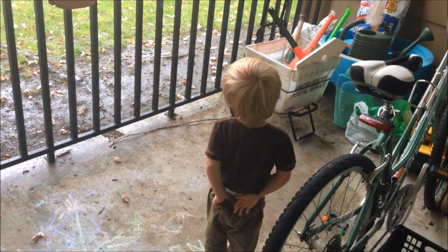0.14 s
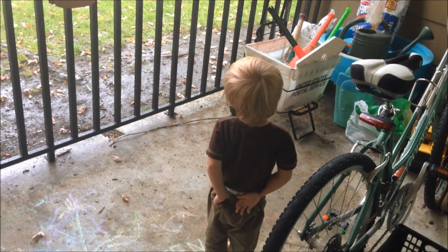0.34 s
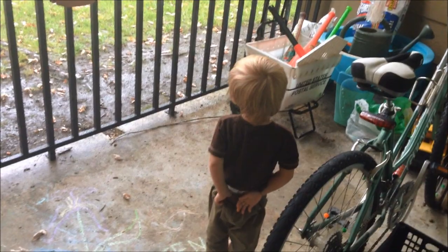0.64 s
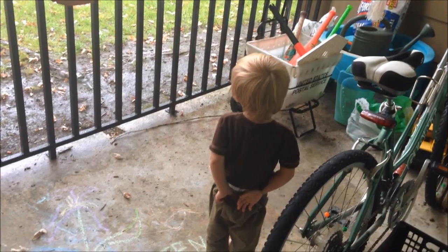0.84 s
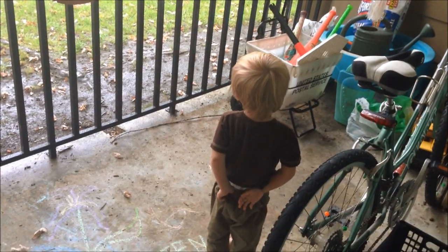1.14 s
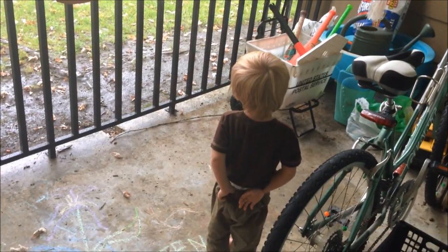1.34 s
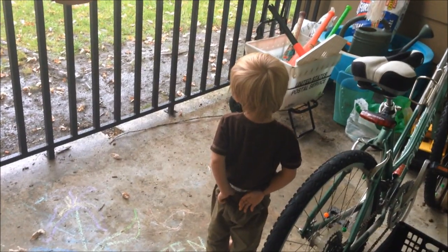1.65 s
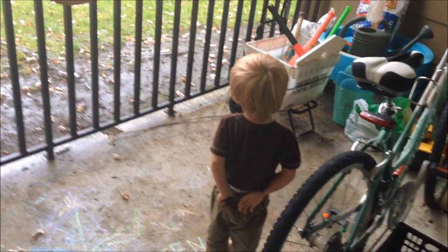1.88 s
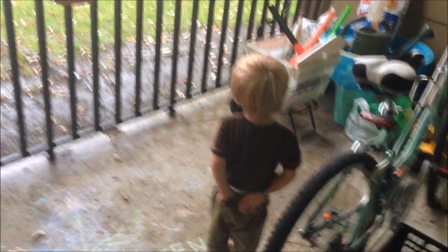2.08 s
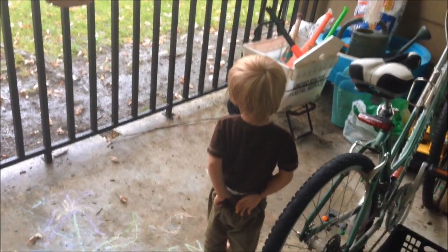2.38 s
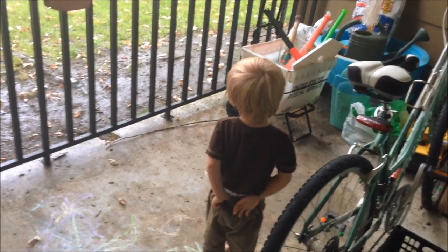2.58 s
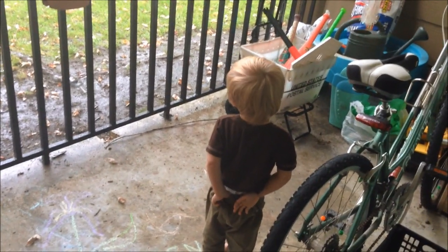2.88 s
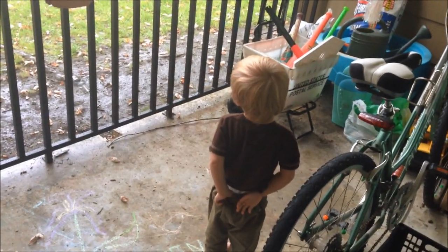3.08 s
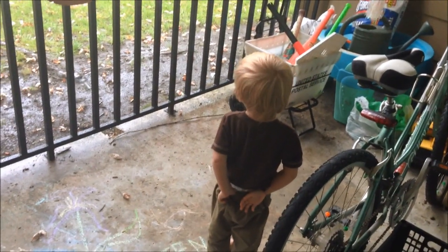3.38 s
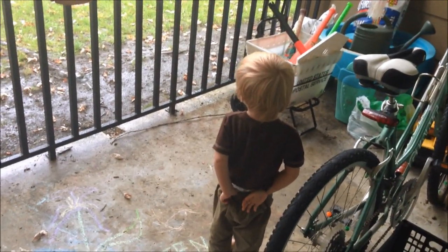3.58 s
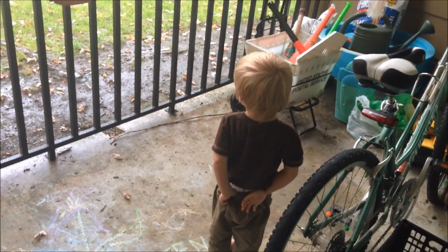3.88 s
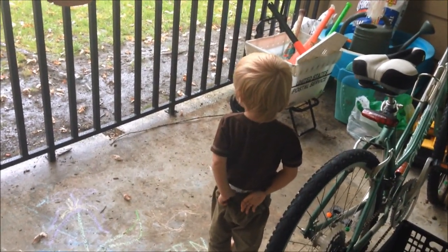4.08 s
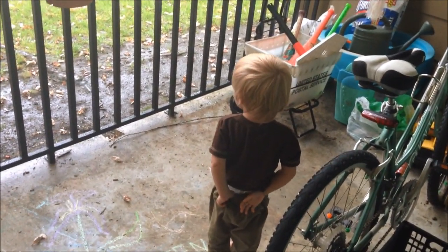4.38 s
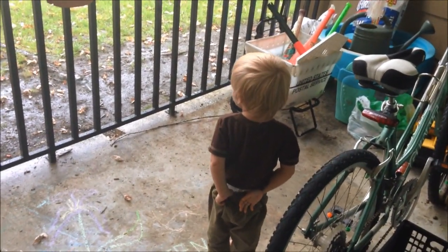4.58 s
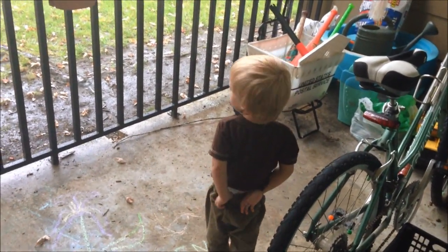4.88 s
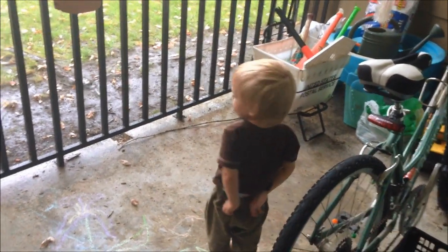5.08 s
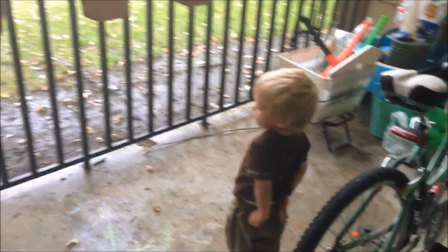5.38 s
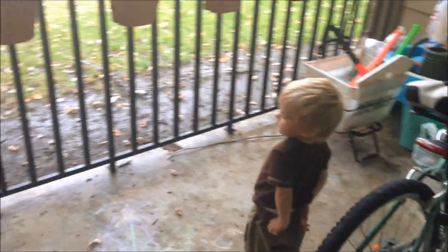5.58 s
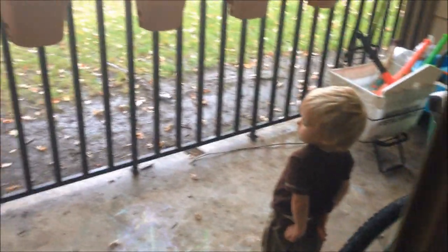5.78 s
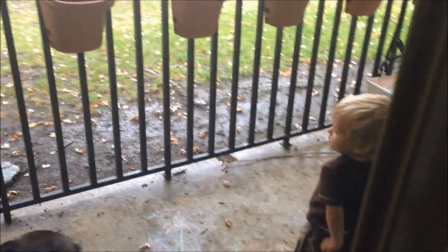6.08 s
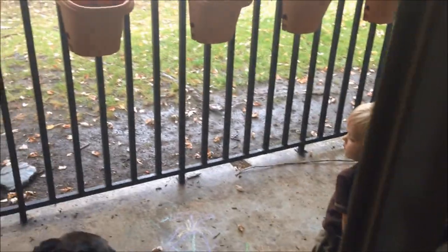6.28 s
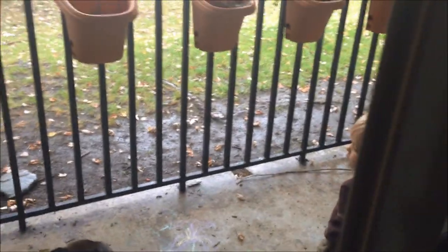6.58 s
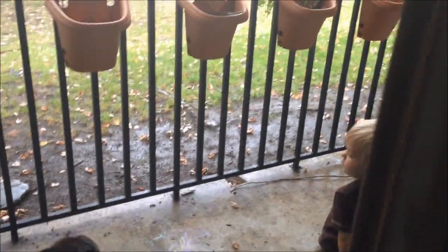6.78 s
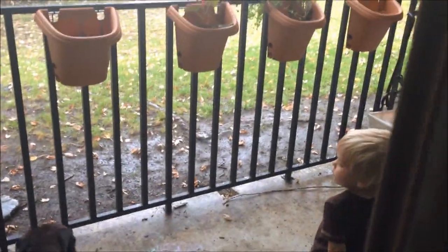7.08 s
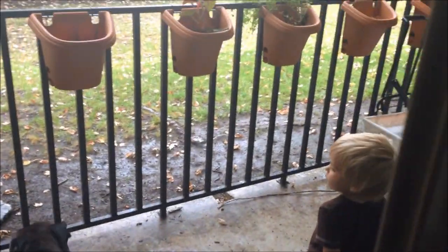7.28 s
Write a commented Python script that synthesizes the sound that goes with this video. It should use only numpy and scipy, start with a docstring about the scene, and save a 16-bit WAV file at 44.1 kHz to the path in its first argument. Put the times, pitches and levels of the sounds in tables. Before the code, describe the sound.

Sharp, uneven drips hit concrete close to the microphone, which sits under a patio roof while rain hisses evenly on the grass and leaves beyond. Duller splashes land in mud between the drips, and the walls add a short echo. Underneath runs a faint, steady machine hum and an outdoor rumble with a few soft bumps. Faint whistles, perhaps distant birds, come early on and once more later.

```python
"""Steady rain on a lawn, heard in mono from under a covered patio.
Far drops merge into a wash; nearer ones plop in mud, patter on leaves and tick on a railing.
Water from the eaves drips on concrete and splashes in the mud; the patio walls throw it back.
Behind it: a steady machine hum, low outdoor rumble with soft bumps, a few faint whistles."""
import sys
import numpy as np
from scipy import signal
from scipy.fft import rfft, irfft
from scipy.io import wavfile
from scipy.ndimage import uniform_filter1d

SR = 44100
rng = np.random.default_rng(int(sys.argv[2]) if len(sys.argv) > 2 else 0)


def to_wav(sig):
    """Store sig (one row per channel, or 1-D mono) as 16-bit WAV at the path in sys.argv[1].

    Samples outside -1..1 are clipped; the rate is SR.
    """
    pcm = np.clip(np.atleast_2d(sig), -1, 1) * 32767
    pcm = np.round(pcm).astype(np.int16)
    wavfile.write(sys.argv[1], SR, pcm.T)  # frames by channels


N = 328545
TIME_S = np.arange(N) / SR

# Table levels are relative.
# Dull body of the rain, easing towards the end: t/s, level/dB
RAIN_BODY = [(0.0, -45.5), (0.65, -54), (1.1, -49.5), (2.3, -53), (3.0, -49), (4.25, -53), (4.9, -50),
             (6.0, -54), (7.45, -54)]
# Spectrum of far rain: f/Hz, level/dB
WASH_SPECTRUM = [(250, -15), (420, 0.5), (770, -1), (850, -3), (1400, -5), (2100, -3.5), (2480, -3),
                 (2850, -6.5), (3700, -4), (6200, -6.5), (7500, -9), (9700, -14), (12500, -18.5),
                 (15200, -20)]
# Drips on the patio edge: t/s, splat level/dB, splat f/Hz, tick level/dB, tick f/Hz, sharpness/0-1
EAVE_DRIPS = [(0.438, -44.5, 4200, -45.5, 6100, 0.1), (0.617, -44.5, 3920, -51.5, 11800, .2),
              (0.835, -55, 6000, -56, 9300, 0), (1.035, -47.5, 5600, -62, 8500, .3),
              (1.215, -48, 7500, -48, 11600, .5), (1.218, -41.5, 5540, -57, 9000, 0.3),
              (1.263, -46, 5400, -61, 10500, 0.1), (1.603, -48.5, 6200, -58, 10000, .3),
              (1.818, -51, 6500, -50, 10200, 0), (2.061, -40.5, 4200, -48, 10000, .75),
              (2.238, -52, 5400, -54, 11000, .8), (2.322, -47.5, 6600, -59, 10000, .8),
              (2.544, -57, 4000, -54, 9800, .8), (3.593, -40, 5800, -48, 12600, 0.6),
              (4.488, -45, 4470, -56, 11000, .1), (4.764, -47, 5400, -57, 10000, .2),
              (5.186, -58, 6000, -50.5, 9200, .2), (5.492, -47.5, 4600, -48.5, 9900, 0),
              (5.687, -38.5, 4300, -48, 7860, 0.3), (5.976, -45.5, 6030, -52, 8600, .1),
              (6.153, -47, 4600, -54, 9000, .7), (6.227, -50, 6500, -56, 8300, .3),
              (6.440, -62, 6000, -54, 11500, .3), (6.584, -36.5, 4700, -44, 8000, .4),
              (6.663, -50, 5600, -56, 9000, .1), (6.775, -48, 6100, -66, 9000, .4),
              (7.090, -43, 4670, -63, 8000, 0.1), (7.382, -39, 4400, -55, 7500, 0.06)]
# Splashes on wet ground: t/s, level/dB, f/Hz
MUD_SPLASHES = [(0.214, -44, 2550), (1.472, -43.5, 2300), (1.689, -44.5, 2200), (2.084, -43, 3300),
                (2.100, -39, 1040), (2.130, -43, 1500), (2.232, -46, 1200), (2.405, -43.5, 1800),
                (2.738, -42, 1490), (2.911, -44.5, 3000), (2.940, -40.5, 1900), (3.020, -43.5, 1000),
                (3.494, -43, 2600), (3.814, -44.5, 2600), (3.865, -45.5, 1400), (4.510, -45, 1000),
                (4.805, -44.5, 1040), (5.190, -49, 1100), (5.355, -45, 1500), (5.378, -44.5, 3900),
                (5.880, -43, 3500)]
# Machine hum, fainter once the microphone turns away: t/s, level/dB
HUM_LEVEL = [(0.0, -45), (3.85, -45), (4.05, -46.5), (5.6, -49), (7.45, -47)]
# Spectrum of outdoor rumble: f/Hz, level/dB
RUMBLE_SPECTRUM = [(20, -29), (42, -29), (58, -9), (80, -12), (112, -10.5), (150, 0.5), (175, -4),
                   (210, -3), (250, -9), (295, -4), (400, -13), (600, -31), (1200, -92)]
# Soft low bumps: t/s, level/dB
LOW_BUMPS = [(0.764, -36), (1.305, -42), (2.111, -36), (2.791, -35), (4.845, -38), (5.01, -40)]
# Thin whistles, perhaps far birds: t/s, length/s, start f/Hz, end f/Hz, level/dB
WHISTLE_NOTES = [(.82, .08, 2600, 2450, -55), (.92, .08, 2650, 2400, -51.5), (1.08, .07, 2250, 2380, -54),
                 (1.34, .06, 2350, 2550, -52), (5.72, .19, 1945, 1952, -49.5)]


def rain(hiss_mean_db=-48.5, hiss_db_per_body_db=-0.68, hiss_rise_db_per_s=0.02):
    """Far wash plus near drops on mud, leaves and railing. Lighter rain sounds finer."""
    body_db = follow(RAIN_BODY)
    hiss_db = hiss_mean_db + hiss_db_per_body_db * (body_db - body_db.mean())
    hiss_db += hiss_rise_db_per_s * (TIME_S - TIME_S.mean())
    body, hiss = gain(body_db), gain(hiss_db)
    wash = gain(3) * np.sqrt(body * hiss) * patchy_noise(WASH_SPECTRUM, patchy_db=1.76)
    mud = shower(per_s=90, span_hz=(780, 1650), octaves=1.6, spread_db=6.5, sharp=0.075, spray_s=0.012)
    leaves = shower(per_s=220, span_hz=(4400, 7500), octaves=1.7, spread_db=1.5,
                    sharp=0.7, spray_s=0.0033)
    railing = shower(per_s=27, span_hz=(8500, 12000), octaves=3, spread_db=-0.5,
                     sharp=0.8, spray_s=0.002, spots=8)
    return wash + gain(-4) * body * mud + hiss * (gain(-9.5) * leaves + gain(-16) * railing)


def shower(per_s, span_hz, octaves, spread_db, sharp, spray_s, spots=24):
    """Drops of random time and size; each landing spot has its own pitch and echoes."""
    out = np.zeros(N)
    for hz in np.geomspace(*span_hz, spots):
        sizes = gain(spread_db * np.minimum(rng.exponential(1, N), 2.5))
        landings = sizes * (rng.random(N) < per_s / spots / SR)
        drop = unit_energy(patio_echo(band(impact(sharp, spray_s), hz, octaves)))
        out += signal.oaconvolve(landings, drop)[:N]
    return unit_rms(out)


def impact(sharp, spray_s, size=3000):
    """One landing: a click with energy share `sharp`, then a decaying spray of droplets."""
    t = np.arange(size) / SR
    spray = rng.standard_normal(size) * rng.exponential(1, size) * np.exp(-t / spray_s)
    return np.sqrt(sharp) * (t == 0) + np.sqrt(1 - sharp) * unit_energy(spray)


def drips(spray_s=0.01, thud_db=-13, thud_ratio=0.63, snap_db=-5.5, gain_db=29.5):
    """Drips on concrete: snap, bright tick, lower splat as the water film spreads, soft thud."""
    out = np.zeros(N)
    for start_s, splat_db, splat_hz, tick_db, tick_hz, sharp in EAVE_DRIPS:
        splat = unit_energy(band(impact(sharp / 2, spray_s), splat_hz, octaves=0.88))
        thud = unit_energy(band(impact(sharp / 2, spray_s), splat_hz * thud_ratio, octaves=0.75))
        tick = unit_energy(band(impact(sharp, spray_s), tick_hz, octaves=0.49, order=3))
        drip = gain(splat_db) * (splat + gain(thud_db) * thud) + gain(tick_db) * tick
        add(out, start_s, patio_echo(drip))
        snap_octaves = 1.4 * (tick_hz / 11000) ** 3  # harder landing: higher tick, wider snap
        snap = unit_energy(band(impact(sharp=0.25, spray_s=0.0023), tick_hz, snap_octaves, order=3))
        add(out, start_s, gain(tick_db + snap_db) * snap)  # direct path only
    return gain(gain_db) * out


def splashes(rise_s=0.0076, top_hz=4700, gain_db=28, size=6000):
    """A string of water breaks on soft ground: a dull droplet cluster swells and dies."""
    out, t = np.zeros(N), np.arange(size) / SR
    envelope = t * np.exp(-t / rise_s)
    for start_s, level_db, hz in MUD_SPLASHES:
        droplets = rng.standard_normal(size) * rng.exponential(1, size) * envelope
        octaves = np.clip(2 * np.log2(top_hz / hz), 0.5, 1.92)
        splash = unit_energy(patio_echo(band(droplets, hz, octaves)))
        add(out, start_s, gain(level_db) * splash)
    return gain(gain_db) * out


def patio_echo(x, echo_s=0.0027, echo_db=-6, tail_db=-3, bass_t60_s=0.28, treble_t60_s=0.21, size=12288):
    """Direct sound, one near-wall reflection, a short tail under the roof. No two spots echo alike."""
    hz, t, spectra = signal.stft(rng.standard_normal(size), SR, nperseg=256)
    t60_s = interp_log_hz([(500, bass_t60_s), (12000, treble_t60_s)], hz)[:, None]
    tail = signal.istft(spectra * gain(-60 * t / t60_s), SR)[1]
    delay_s = echo_s * 2 ** (rng.random() - 0.5)
    response = signal.unit_impulse(size)
    add(response, delay_s, gain([echo_db]))
    add(response, 2 * delay_s, gain(tail_db) * unit_energy(tail))
    return signal.fftconvolve(x, unit_energy(response))


def machine_hum(hz=349, waver_turns=0.008, waver_db=0.9, octave_db=-22, gain_db=-0.8):
    """Steady machine tone with a weak octave; phase and level waver slightly."""
    turns = hz * TIME_S + waver_turns * drift(rate_hz=2)
    octave = gain(octave_db) * np.sin(4 * np.pi * turns) * (1 + 0.5 * drift(rate_hz=3))
    tone = unit_rms(np.sin(2 * np.pi * turns) + octave)
    return gain(follow(HUM_LEVEL) + gain_db + waver_db * drift(rate_hz=14)) * tone


def rumble(level_db=-51):
    """Low outdoor noise, slightly uneven."""
    return gain(level_db) * patchy_noise(RUMBLE_SPECTRUM, patchy_db=1)


def bumps(hz=155, rise_s=0.0035, size=4000):
    """Soft low bumps, a few cycles each, standing out of the rumble."""
    out, t = np.zeros(N), np.arange(size) / SR
    envelope = t / rise_s * np.exp(1 - t / rise_s)
    bump = envelope * np.sin(2 * np.pi * hz * t)
    for start_s, level_db in LOW_BUMPS:
        add(out, start_s, gain(level_db) * bump)
    return out


def whistles(waver_turns=0.1, flutter_depth=0.55):
    """Faint thin notes swell, glide and fade; level and pitch flutter."""
    out = np.zeros(N)
    for start_s, length_s, start_hz, end_hz, level_db in WHISTLE_NOTES:
        size = round(length_s * SR)
        glide_hz = np.linspace(start_hz, end_hz, size)
        turns = np.cumsum(glide_hz) / SR + waver_turns * drift(rate_hz=50)[:size]
        flutter = 1 + flutter_depth * drift(rate_hz=90)[:size]
        envelope = gain(level_db) * signal.windows.cosine(size) * flutter
        add(out, start_s, envelope * np.sin(2 * np.pi * turns))
    return out


def patchy_noise(spectrum, patchy_db, frame=256):
    """Coloured noise, rms 1; level wanders in patches of time and frequency."""
    spectra = signal.stft(rng.standard_normal(N), SR, nperseg=frame)[2]
    patches = uniform_filter1d(rng.standard_normal(spectra.shape), size=11, axis=1)
    patches = unit_rms(uniform_filter1d(patches, size=12, axis=0))
    white = signal.istft(spectra * gain(patchy_db * patches), SR, nperseg=frame)[1][:N]
    colour = gain(interp_log_hz(spectrum, np.fft.rfftfreq(N, 1 / SR)))
    return unit_rms(irfft(rfft(white) * colour, N))


def drift(rate_hz):
    """Slow random wander, rms 1."""
    hz = np.fft.rfftfreq(N, 1 / SR)
    lowpass = np.exp(-(hz / rate_hz) ** 2) * (hz > 0)
    return unit_rms(irfft(rfft(rng.standard_normal(N)) * lowpass, N))


def band(x, hz, octaves, order=2):
    """Broad resonance around hz, shifted down if too near Nyquist."""
    top_hz = min(hz * 2 ** (octaves / 2), SR / 2 - 1000)
    sos = signal.butter(order, [top_hz / 2 ** octaves, top_hz], "band", fs=SR, output="sos")
    return signal.sosfilt(sos, x)


def gain(db):
    """dB to amplitude."""
    return 10 ** (np.asarray(db) / 20)


def unit_rms(x):
    """Scale to rms 1."""
    return x / np.sqrt(np.mean(x ** 2) + 1e-20)


def unit_energy(x):
    """Scale to energy 1."""
    return x / np.sqrt(np.sum(x ** 2) + 1e-20)


def interp_log_hz(points, hz):
    """Interpolate on a log-frequency axis."""
    points_hz, values = np.transpose(points)
    return np.interp(np.log(hz + 1), np.log(points_hz + 1), values)


def follow(curve):
    """Level curve at every sample."""
    times_s, levels_db = np.transpose(curve)
    return np.interp(TIME_S, times_s, levels_db)


def add(mix, start_s, sound):
    """Mix in at start_s."""
    part = mix[max(round(start_s * SR), 0):][:len(sound)]
    part += sound[:len(part)]


def scene():
    """Rain and eave water over the background; both channels alike."""
    background = rumble()
    water = rain() + drips() + splashes()
    background += bumps() + machine_hum() + whistles()
    mono = water + background
    return np.array([mono, mono])


def record(dry, cutoff_hz=15400):
    """Steep low-pass band limit."""
    lowpass = signal.firwin(601, cutoff_hz, window=("kaiser", 8), fs=SR)
    return signal.oaconvolve(dry, lowpass[None], "same")


dry = scene()
out = record(dry)
to_wav(out)
```